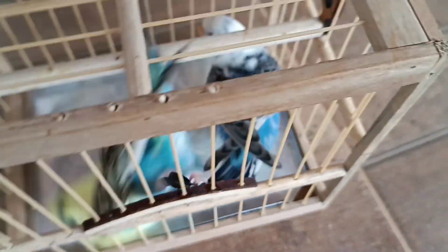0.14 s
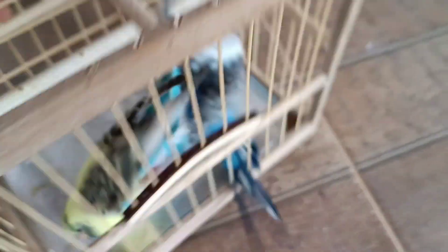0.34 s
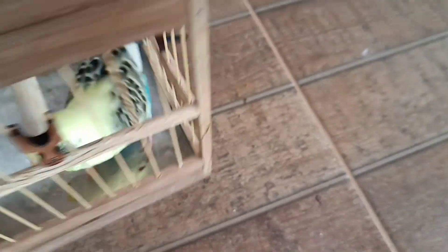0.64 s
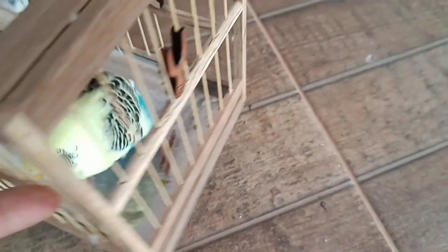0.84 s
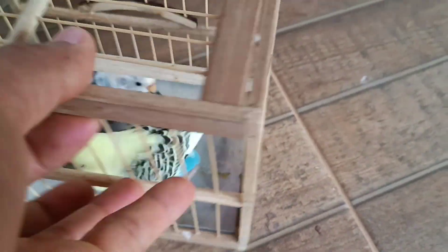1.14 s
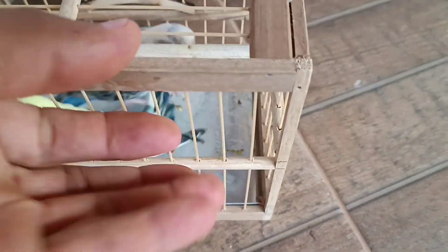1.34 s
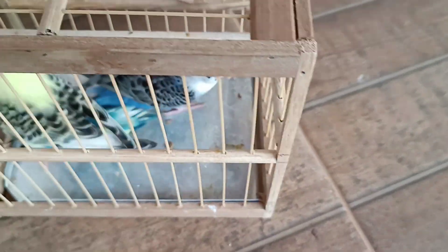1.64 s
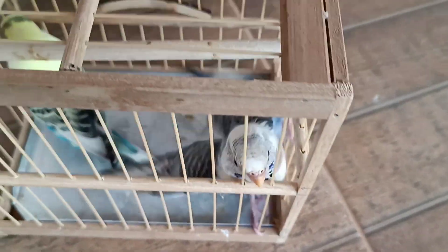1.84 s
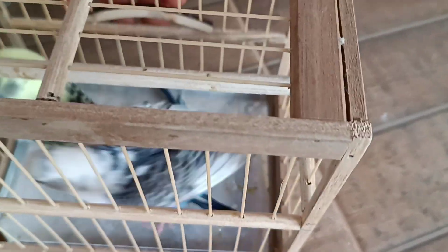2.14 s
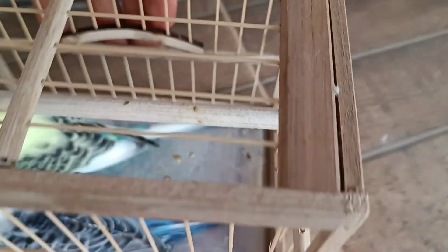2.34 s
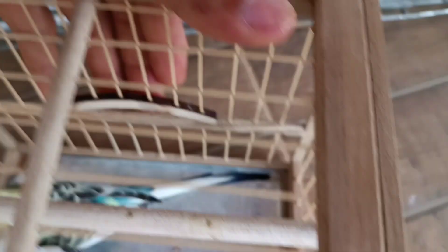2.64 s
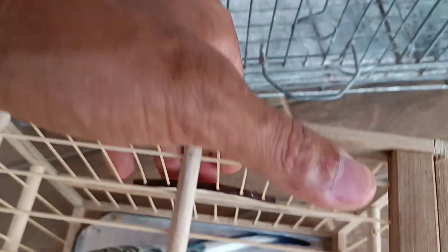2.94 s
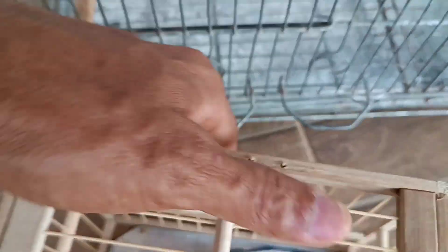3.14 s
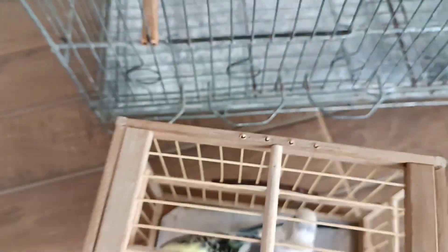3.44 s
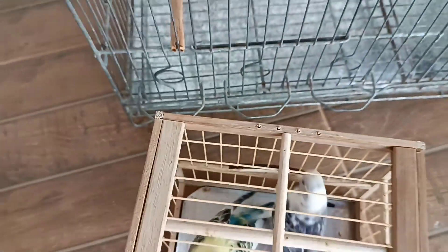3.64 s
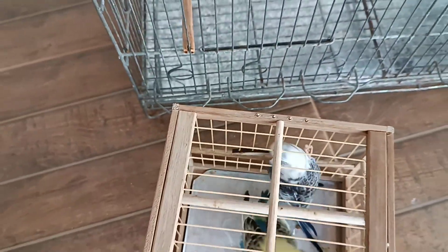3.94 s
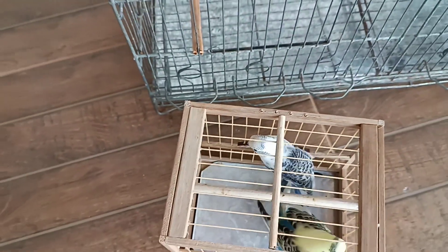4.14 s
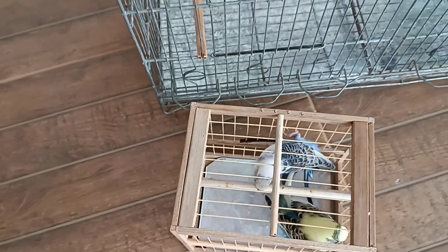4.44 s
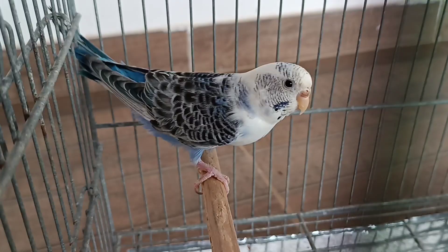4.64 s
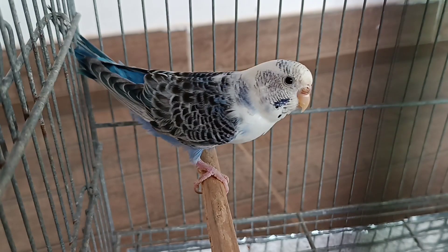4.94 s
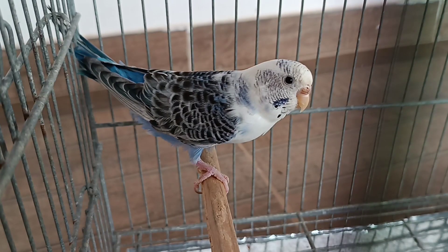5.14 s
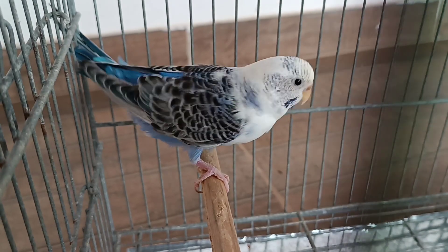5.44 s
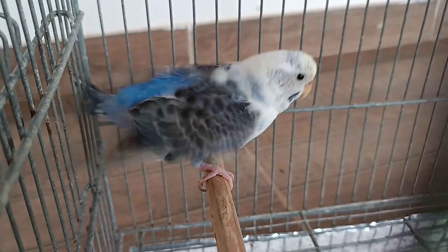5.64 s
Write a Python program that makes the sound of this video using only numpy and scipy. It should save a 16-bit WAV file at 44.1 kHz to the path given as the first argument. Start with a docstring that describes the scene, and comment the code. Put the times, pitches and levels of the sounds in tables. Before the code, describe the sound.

From the start, budgies scrabble in a small wooden cage close by: gritty claw ticks, feather rustles and light knocks on the frame and bars, with a sharper knock at 0.3 seconds. Wings flutter at about 1.2 and 1.9 seconds with soft thumps. Other birds warble and chirp faintly across the slightly echoing room, clearest around 1, 2.2 and 4 seconds, over quiet room tone. Low handling rumble builds near 3 seconds, and at 3.2 the cage is set down on tiles with a clattering wooden thud, the loudest event. A wing swishes at 3.5 seconds and the scratching thins out. At 4.6 seconds the sound cuts to silence, then quickly fades back in. One close bird gives two trilled, slightly raspy chirps at about 4.9 and 5.3 seconds, followed by a faint feather rustle until nearly 6 seconds.

```python
"""Budgerigars scrabble and flutter in a small wooden carry cage that a hand turns and sets down on tiles.
Claws tick on the tray in gritty bursts, feathers rustle, bodies ring the frame, bars and bottom.
Underneath are handling rumble, room tone and a flock warbling further off in the echoing room.
The sound then cuts to silence and fades back in on one close bird that chirps twice in a trilled whistle."""
import sys
import numpy as np
from scipy import signal
from scipy.fft import rfft, irfft
from scipy.io import wavfile
from scipy.ndimage import uniform_filter1d

SR = 44100
rng = np.random.default_rng(int(sys.argv[2]) if len(sys.argv) > 2 else 0)


def bounce(signal):
    """Save signal as a 16-bit WAV file at the path given by the first command-line argument."""
    frames = np.transpose(np.atleast_2d(signal))
    limited = np.clip(frames, -1, 1)
    pcm = np.round(limited * 32767).astype(np.int16)
    wavfile.write(sys.argv[1], SR, pcm)


N = 255780
T = np.arange(N) / SR

# room tone EQ: freq_hz, gain_db
ROOM_EQ = [(15, -31), (25, -9), (217, -1.5), (714, -17.5), (1190, -12.5), (1840, -15), (2160, -10.5),
           (3250, -7.5), (4370, -12.5), (4740, -18.5), (10700, -21), (14800, -24.5), (16000, -43)]
# reverb decay of the room: freq_hz, t60_s
ROOM_DECAY = [(150, 0.76), (1500, 0.43), (5000, 0.38), (14000, 0.17)]
# handling rumble EQ: freq_hz, gain_db
RUMBLE_EQ = [(24, -43), (40, -19.5), (92, -3), (275, 4), (391, 1), (609, -6.5), (790, -5.5), (900, -9),
             (1170, -32.5), (1980, -120)]
# phrases of the distant flock: start_s, hold_s, level_db, start_hz, end_hz
FLOCK_PHRASES = [(0.14, 0.034, -47, 2880, 3100), (0.83, .04, -57, 2800, 2900),
                 (0.962, 0.09, -47, 2938, 2900), (1.5, 0.081, -55, 3440, 3550),
                 (1.97, .12, -51, 3350, 3293), (2.25, .12, -52, 3300, 3305), (2.774, 0.16, -51, 3380, 3340),
                 (3.7, .22, -56.5, 3500, 3340), (4.399, .07, -54, 3190, 3044),
                 (4.52, .06, -56.5, 3400, 3597), (5.48, 0.035, -58, 2440, 2446),
                 (5.65, .04, -55, 3410, 3284)]
# single calls across the room: start_s, length_s, start_hz, end_hz, level_db
FAR_CALLS = [(.12, .02, 1075, 1514, -54), (0.148, 0.038, 1270, 1820, -52),
             (0.141, 0.047, 2910, 3390, -53.5), (.19, 0.052, 2050, 2400, -47.5),
             (0.817, 0.016, 3240, 3310, -47), (0.858, 0.01, 3470, 3550, -48.5),
             (.82, 0.033, 2380, 2370, -49), (.878, 0.058, 2350, 2580, -42),
             (0.914, 0.043, 3754, 3695, -39.5), (0.945, 0.046, 3600, 3370, -42),
             (0.958, 0.039, 2810, 2963, -36), (0.994, 0.046, 2500, 2310, -51),
             (1.001, 0.056, 3400, 2990, -51), (2.12, 0.043, 3330, 3300, -44),
             (2.155, 0.03, 3260, 3290, -48), (2.172, 0.037, 2000, 2510, -42),
             (2.203, 0.027, 3450, 3460, -41), (2.228, 0.021, 3360, 2860, -39),
             (2.252, .045, 2280, 1664, -49), (3.91, 0.03, 2150, 2500, -46),
             (3.941, 0.0286, 3604, 3120, -38), (3.973, 0.022, 3370, 3160, -54),
             (4.322, 0.033, 3780, 3620, -60), (4.344, 0.028, 1740, 1980, -54),
             (4.36, 0.045, 2500, 2490, -54.5), (4.392, 0.037, 3700, 3180, -45),
             (4.418, 0.048, 2760, 2822, -48.5), (4.44, 0.035, 3400, 3540, -55),
             (4.521, 0.043, 4000, 4290, -60), (4.526, 0.061, 2985, 3514, -59)]
# thin steady whistles and two faint low hoots, far off: start_s, length_s, start_hz, end_hz, level_db
FAR_WHISTLES = [(1.3, 0.081, 640, 660, -55.5), (1.46, 0.029, 4450, 4420, -56.5),
                (1.53, 0.025, 4470, 4470, -59), (1.58, 0.035, 4460, 4370, -59),
                (1.7, 0.13, 4360, 4323, -61.5), (2.27, 0.048, 647.5, 640, -65)]
# throat EQ that colours the overtones: freq_hz, gain_db
THROAT_EQ = [(700, -14), (1350, -6.5), (1800, -5.5), (2700, 9.5), (3600, -1.5), (5000, -8), (7500, 2.5),
             (15000, -6.5)]
# overtones of a bird's whistle: multiple, gain_db
VOICE_OVERTONES = [(2, -17.5), (3, -27), (4, -34.5), (5, -35.5), (6, -44)]
# the close bird, one curve for each note: time_s, pitch_hz, level_db
NEAR_NOTES = [
    [(4.867, 3630, -48), (4.876, 3667, -48.5), (4.89, 3430, -39)],
    [(4.891, 1816, -33), (4.902, 1832, -32), (4.91, 1890, -33), (4.927, 2185, -43)],
    [(4.929, 2187, -28), (4.94, 2224, -30), (4.95, 2387, -29), (4.96, 2480, -29), (4.985, 2530, -41),
     (5.003, 2455, -39), (5.02, 2083, -36), (5.04, 1767, -37.5), (5.05, 1436, -38), (5.062, 1340, -40)],
    [(5.241, 3210, -40), (5.248, 3222, -26.5), (5.256, 3180, -29.5), (5.259, 2900, -39), (5.265, 2660, -50)],
    [(5.268, 1785, -56), (5.285, 1740, -45.5), (5.296, 1837, -40.5)],
    [(5.306, 2430, -37), (5.322, 2436, -40), (5.335, 2400, -30.5), (5.352, 2460, -38)],
    [(5.383, 2430, -29), (5.39, 1955, -41.5), (5.407, 1966, -37), (5.418, 1364, -41.5), (5.432, 757, -58)],
]
# tremolo on each of those notes: depth
TRILL_DEPTHS = [.05, .05, .32, .02, .31, .36, .28]
# resonances of the cage bottom: pitch_hz, gain_db, t60_s
BOTTOM_MODES = [(96.2, -4, 0.52), (152.6, -2, 0.21), (188, -3, 0.12), (283.3, -3, 0.15), (378, -1.5, 0.063),
                (503, 1, 0.029), (571, 0, 0.069)]
# blows on the cage bottom: start_s, level_db, favoured_hz
BOTTOM_BLOWS = [(0.324, -40.5, 290), (1.207, -44, 292), (2.578, -50, 101.8), (2.646, -52.5, 97.4),
                (2.95, -29, 198.6), (2.982, -31.5, 227), (3.032, -35.5, 202.5), (3.163, -20, 550),
                (3.184, -26.5, 425), (3.215, -32.5, 100), (3.241, -31, 526)]
# puffs of air from a wing: start_s, level_db, final_hz, start_pitch_ratio
WING_PUFFS = [(1.066, -43, 100, 3.5), (1.503, -43, 75.6, 12.0), (1.862, -31, 103, 2.2)]
# resonances of the heavy frame: pitch_hz, width_hz, gain_db
FRAME_MODES = [(414, 41, -3), (734, 76, -9), (845, 85, -6), (1185, 276, 17), (1400, 35, 8), (1490, 270, 1)]
# resonances of the thin bars: pitch_hz, width_hz, gain_db
BAR_MODES = [(1945, 200, -1.5), (2254, 370, 3), (2720, 130, -1), (3370, 500, -24.5)]
# bodies knocking the frame: start_s, level_db, bars_offset_db
BODY_KNOCKS = [(0.32, -18.5, 5.5), (0.329, -16.5, 0), (0.44, -36.5, 16), (0.499, -21, 8.5),
               (0.529, -27.5, -10.5), (0.669, -37, 1), (0.779, -42, 9), (0.816, -42.5, 13),
               (0.903, -39, 11.5), (1.098, -35, -12), (1.145, -27.5, 10), (1.204, -34, 8.5),
               (1.217, -30, -10), (1.255, -35, 12), (1.305, -25.5, 5), (1.393, -35.5, -11),
               (1.503, -43, -18), (1.552, -32, -11), (1.788, -35, -1.5), (1.833, -35, 3.5),
               (1.852, -28.5, -7.5), (1.868, -25.5, -1), (1.887, -25.5, -7.5), (2.118, -42, 6),
               (2.136, -37, -8), (2.191, -35, 10), (2.388, -29, -8), (2.403, -32, -2), (2.671, -30.5, -7),
               (2.877, -41.5, -11.5), (2.954, -32, -6), (3.117, -38.5, -11), (3.128, -39, 3),
               (3.163, -10, -17), (3.168, -10.5, -9.5), (3.184, -13.5, -9.5), (3.196, -15, -11),
               (3.217, -18.5, -12), (3.242, -23, -25), (3.348, -18, -10.5), (3.434, -35, -10),
               (3.648, -27.5, -7), (3.708, -41, -27), (3.742, -39, -17), (3.828, -40, -15),
               (4.221, -43, -6), (5.382, -41.5, 12)]
# bouts of stirring in the cage: start_s, hold_s, feather_db, rattle_db, rumble_db
STIR_BOUTS = [(0.0, 0.015, -54.5, -57.5, -62.5), (0.235, 0.1, -48.5, -55, -66),
              (0.375, 0.14, -54, -52.5, -70), (1.09, 0.031, -72, -56, -57), (1.21, 0.17, -43, -49, -54.5),
              (1.849, 0.071, -47.5, -53, -51.5), (2.113, 0.28, -54, -63, -69),
              (2.44, 0.029, -77, -84, -61.5), (2.866, 0.068, -60, -61.5, -60.5),
              (2.959, 0.049, -85, -57, -42.5), (3.164, 0.072, -46.5, -31, -35.5),
              (3.52, 0.046, -43, -60, -59), (3.705, 0.38, -60, -64, -62), (4.226, 0.12, -62.5, -69, -61),
              (5.36, 0.13, -59.5, -82, -64.5), (5.619, 0.21, -62.5, -70, -63)]
# feather rustle EQ: freq_hz, gain_db
FEATHER_EQ = [(1000, -19), (2000, 11), (3500, 8.5), (6000, -2.5), (10000, -11), (13000, -14.5),
              (16000, -24)]
# wings sweeping the bars: start_s, length_s, level_db, centre_hz
WING_SWEEPS = [(1.2, 0.18, -41.5, 5100), (1.3, 0.14, -75, 4000), (1.84, 0.22, -57, 7000),
               (3.2, 0.089, -58, 5000), (3.505, 0.14, -37, 4400)]
# claws on the tray: start_s, level_db, dull_offset_db, length_s
CLAW_TICKS = [(0.208, -35.5, -1, 0.01), (0.237, -29.5, -18, 0.015), (0.28, -43.5, -11.5, 0.034),
              (0.3116, -31, -22, 0.01), (0.319, -16.5, 6, 0.0052), (0.328, -25, 2.5, 0.0068),
              (0.351, -30, 4, 0.015), (0.411, -39, -14.5, 0.015), (0.421, -32, -20, 0.015),
              (0.443, -34.5, 0.5, 0.014), (0.4755, -36, -16, 0.027), (0.492, -23, -6, 0.012),
              (0.529, -37, -4, 0.012), (0.598, -43, -22, 0.032), (0.6574, -24, -34, 0.013),
              (0.741, -28, -30, 0.0064), (0.78, -29.5, -28, 0.0085), (0.815, -32, -16, 0.016),
              (0.839, -30, -35, 0.0088), (0.864, -33.5, -18, 0.012), (0.8985, -31, -29, 0.021),
              (0.9472, -25, -36, 0.017), (1.072, -32.5, -27, 0.011), (1.142, -43, 9, 0.03),
              (1.181, -33, -8, 0.009), (1.1987, -24.5, 9, 0.0063), (1.252, -26, 6, 0.013),
              (1.358, -34, -14, 0.027), (1.433, -29, 0, 0.0055), (1.472, -49, 9, 0.011),
              (1.495, -33.5, -18, 0.013), (1.531, -35.5, 7, 0.0087), (1.592, -39, -15, 0.0054),
              (1.607, -34.5, -19, 0.0052), (1.764, -37.5, -25, 0.011), (1.786, -51.5, 12.5, 0.018),
              (1.821, -26, -5.5, 0.014), (1.853, -29.5, 6.5, 0.01), (1.871, -30, 3, 0.0091),
              (1.8893, -21, -2, 0.0075), (1.911, -26, -9, 0.011), (1.976, -27.5, -18, 0.0057),
              (1.9994, -36, -3, 0.0082), (2.059, -28.5, 2, 0.0094), (2.1081, -27.5, 15, 0.0043),
              (2.131, -32, 2, 0.01), (2.1888, -36, 18, 0.0058), (2.3334, -36.5, 3, 0.016),
              (2.353, -27, 1, 0.013), (2.388, -26.5, -2, 0.0091), (2.401, -31, 9.5, 0.0075),
              (2.4708, -33, 3, 0.0071), (2.663, -37, 3, 0.012), (2.675, -33.5, 14.5, 0.0032),
              (2.74, -44.5, -11, 0.011), (2.954, -48, 3, 0.028), (3.133, -47.5, 12.5, 0.0094),
              (3.167, -35, -12.5, 0.0099), (3.183, -23.5, -21, 0.014), (3.3477, -23.5, 1, 0.0067),
              (3.434, -29.5, 2.5, 0.011), (3.598, -30, -25, 0.01), (3.6415, -30.5, -0.5, 0.013),
              (3.7764, -30, -5, 0.01), (3.826, -26, -21, 0.0062), (3.96, -40, 4.5, 0.011),
              (4.079, -37.5, 1.5, 0.014), (4.239, -38.5, -19, 0.016), (4.356, -36.5, -18, 0.0065)]
# EQ of a claw's bright scratch: freq_hz, gain_db
CLAW_EQ = [(1500, -11), (2500, 0), (5000, -8), (8500, 1), (10500, 3.5), (13000, -9), (16000, -16)]

TOP_HZ = 16300  # ceiling for overtones and for the mix
CREST_DB = 10  # headroom for the peaks of gritty noise
BOUT_ATTACK_S, BOUT_RELEASE_S = 0.029, 0.55


def undb(db):
    """Decibels to gain."""
    return 10 ** (np.asarray(db, float) / 20)


def unit(x):
    """Normalise to an RMS of 1."""
    return x / np.sqrt(np.mean(x ** 2))


def eq_db(hz, table):
    """Read an EQ curve on a log frequency axis."""
    points_hz, db = np.transpose(table)
    return np.interp(np.log(hz), np.log(points_hz), db)


def colour(x, table):
    """Apply an EQ curve; white noise keeps its power."""
    gain = undb(eq_db(np.arange(N // 2 + 1) * SR / N + 1, table))
    return irfft(rfft(x) * unit(gain), N)


def ring(x, hz, width_hz):
    """One resonance, gain 1 at its centre."""
    return signal.lfilter(*signal.iirpeak(hz, hz / width_hz, SR), x)


def walk(rate_hz):
    """Slewed random sample-and-hold with a spread near 1."""
    step = int(SR / rate_hz)
    return 1.2 * uniform_filter1d(np.repeat(rng.standard_normal(N // step + 1), step), step)[:N]


def grit(rate_hz, depth_db):
    """Noise whose level jumps from grain to grain."""
    return unit(rng.standard_normal(N) * undb(depth_db * walk(rate_hz)))


def held(start, hold, attack_s, release_s):
    """Envelope at full level from start through hold; attack and release each span 60 dB."""
    early, late = np.clip(start - T, 0, None), np.clip(T - start - hold, 0, None)
    return undb(-60 * (early / attack_s + late / release_s))


def bursts(starts, dbs, lengths, rise_s=0.0013):
    """Envelope of brief contacts: sharp attack, quick decay."""
    env, t = np.zeros(N), T[:3000]
    for start, db, length in zip(starts, dbs, lengths):
        shape = (1 - np.exp(-t / rise_s)) * np.exp(-(t / length) ** 1.32)
        env[int(start * SR):][:len(t)] += undb(db) * shape
    return env


def room_tone(level_db=-60, lift_s=5, lift_db=1):
    """A gently wavering bed with the sub-bass cut, a touch louder by the close bird."""
    tone = colour(grit(9, 2), ROOM_EQ) * undb(level_db + lift_db * (T > lift_s))
    return signal.sosfilt(signal.butter(2, 50, "high", fs=SR, output="sos"), tone)


def reverb(x, predelay_s=.006):
    """Diffuse tail of the room, the treble dying first."""
    t, tail = T[:SR], 0
    hz, t60s = np.transpose(ROOM_DECAY)
    for centre in 100 * 2 ** np.arange(0, 7.5, .5):
        band = unit(ring(rng.standard_normal(SR), centre, centre / 2)) * np.sqrt(centre)
        t60 = np.interp(np.log(centre), np.log(hz), t60s)
        tail += band * undb(-60 * t / t60)
    tail *= np.clip((t - predelay_s) / 0.0018, 0, 1)
    return signal.fftconvolve(x, tail / np.sqrt(np.sum(tail ** 2)))[:N]


def handling(rumble, buffet_hz=49.9, buffet_db=-65.5):
    """The hand rumbles on the cage, and air buffets the microphone while it is carried."""
    hand = rumble * colour(grit(30, 2), RUMBLE_EQ)
    gusts = unit(ring(ring(grit(5.5, 4), buffet_hz, 50), buffet_hz, 50))
    carried = held(start=2.55, hold=1.05, attack_s=BOUT_ATTACK_S, release_s=2.5)
    return hand + undb(buffet_db) * carried * gusts


def flock(rasp_db=5):
    """Six distant birds warble short, raspy glides around a common pitch."""
    start, hold, _, start_hz, end_hz = np.transpose(FLOCK_PHRASES)
    centre = np.interp(T, np.ravel([start, start + hold], "F"), np.ravel([start_hz, end_hz], "F"))
    voices = 0
    for detune in (-0.14, -0.011, 0.065, 0.057, .05, 0.039):
        pitch = centre * np.exp(detune + .04 * walk(60) + .03 * walk(400))
        flicker = undb(3 * walk(60) + rasp_db * walk(250))
        voices += np.sin(2 * np.pi * np.cumsum(pitch) / SR) * flicker
    phrasing = sum(undb(db) * held(at, length, attack_s=.16, release_s=.29)
                   for at, length, db, *_ in FLOCK_PHRASES)
    return unit(voices) * phrasing


def whistle(t, hz, db, trill, trill_hz=140):
    """A near-sine voice with fast tremolo; overtones grow when pushed and where the throat favours them."""
    phase = 2 * np.pi * np.cumsum(hz) / SR
    tone = np.sin(phase)
    push_db = .6 * (db + 28)
    for k, share_db in VOICE_OVERTONES:
        throat_db = eq_db(k * hz, THROAT_EQ) - eq_db(hz, THROAT_EQ)
        tone += undb(share_db + throat_db + push_db) * np.sin(k * phase) * (k * hz < TOP_HZ)
    gate = np.clip(np.minimum(t - t[0], t[-1] - t) / 0.0011, 0, 1)
    tremolo = 1 + trill * np.sin(2 * np.pi * trill_hz * t)
    return np.sqrt(2) * tone * gate * undb(db) * tremolo


def sing(notes, trills, wobble):
    """Whistle each note curve; wobble is fast jitter as a fraction of the pitch."""
    out, jitter = np.zeros(N), 1 + wobble * walk(300)
    for note, trill in zip(notes, trills):
        times, hz, db = np.transpose(note)
        part = slice(int(times[0] * SR), int(times[-1] * SR))
        t = T[part]
        out[part] += whistle(t, np.interp(t, times, hz) * jitter[part], np.interp(t, times, db), trill)
    return out


def far_calls(rows, wobble):
    """Birds across the room whistle plain glides that swell and fade."""
    notes = [[(at, f0, db - 12.5), (at + length / 2, (f0 + f1) / 2, db), (at + length, f1, db - 10)]
             for at, length, f0, f1, db in rows]
    return sing(notes, np.zeros(len(notes)), wobble)


def near_bird(rasp_db=1.5):
    """One close bird chirps in trilled notes with a slight rasp."""
    return sing(NEAR_NOTES, TRILL_DEPTHS, wobble=.018) * undb(rasp_db * walk(400))


def thuds(octave_loss_db=25.5, puff_t60_s=.12, sag_s=.008):
    """Blows ring the cage bottom around a favoured pitch; wing puffs thump with a sagging pitch."""
    out, t = np.zeros(N), T[:SR // 2]
    attack = 1 - np.exp(-t / 0.0026)
    for start, db, favoured_hz in BOTTOM_BLOWS:
        for hz, mode_db, t60 in BOTTOM_MODES:
            share_db = mode_db - octave_loss_db * np.log2(hz / favoured_hz) ** 2
            env = attack * undb(db + share_db - 60 * t / t60)
            out[int(start * SR):][:len(t)] += env * np.sin(2 * np.pi * hz * t)
    for start, db, hz, ratio in WING_PUFFS:
        phase = 2 * np.pi * hz * (t + (ratio - 1) * sag_s * (1 - np.exp(-t / sag_s)))
        out[int(start * SR):][:len(t)] += attack * undb(db - 60 * t / puff_t60_s) * np.sin(phase)
    return out * undb(6.1 * walk(140))  # loose wood makes the ring uneven


def wood(push, modes):
    """Wood rings briefly when pushed; the soft contact gives it little treble."""
    power = sum(undb(2 * db) * width for _, width, db in modes) * np.pi / SR
    body = sum(undb(db) * ring(push, hz, width) for hz, width, db in modes) / np.sqrt(power)
    return signal.sosfilt(signal.butter(2, [450, 4200], "band", fs=SR, output="sos"), body)


def knocks(rattle, contact_s=0.0091):
    """Bodies knock the heavy frame and the thin bars; loose joints rattle on."""
    starts, db, bars_db = np.transpose(BODY_KNOCKS)
    lengths = np.full(len(starts), contact_s)
    crack = np.zeros(N)
    crack[(starts * SR).astype(int) + 20] = undb(db + 10)  # the first hard touch
    on_frame = crack + grit(500, 3) * bursts(starts, db - CREST_DB, lengths)
    frame = wood(on_frame + rattle * grit(300, 3), FRAME_MODES)
    on_bars = grit(500, 3) * bursts(starts, db + bars_db - CREST_DB, lengths)
    return frame + wood(on_bars + rattle * grit(300, 3) / 2, BAR_MODES)


def wings(rustle):
    """Wings swish along the bars, swelling fast and tapering off, over a grainy rustle of feathers."""
    swishes = 0
    for start, length, db, hz in WING_SWEEPS:
        stroke = np.clip((T - start) / length, 0, 1)
        swell = np.abs(np.sin(np.pi * stroke ** 0.56)) ** 1.2
        hiss = unit(ring(ring(grit(400, 1.7), hz, 0.69 * hz), hz, 1.2 * hz))
        swishes += undb(db) * swell * hiss
    return swishes + rustle * colour(grit(250, 2.4), FEATHER_EQ)


def claws():
    """Each scratch is a bright gritty burst with a duller layer from the tray."""
    starts, db, dull_db, lengths = np.transpose(CLAW_TICKS)
    bright = colour(grit(900, 3) * bursts(starts, db - CREST_DB, lengths), CLAW_EQ)
    on_tray = grit(700, 3) * bursts(starts, db + dull_db - CREST_DB, lengths)
    makeup_gain = np.sqrt(SR / np.pi / 3500)
    return bright + makeup_gain * ring(on_tray, hz=3600, width_hz=2400)


def scene():
    """Mix cage and birds over the room tone; the further a source, the wetter it sounds."""
    rustle, rattle, rumble = sum(undb(dbs)[:, None] * held(start, hold, BOUT_ATTACK_S, BOUT_RELEASE_S)
                                 for start, hold, *dbs in STIR_BOUTS)
    cage = knocks(rattle) + claws() + wings(rustle)
    calls = far_calls(FAR_CALLS, wobble=.012) * undb(3.5 * walk(250))  # rasp
    calls += far_calls(FAR_WHISTLES, wobble=0)
    chatter, chirps, thumps = flock(), near_bird(), thuds()
    direct = cage + thumps + chirps + undb(0.5) * calls + undb(-22.5) * chatter
    send = (undb(-11) * cage + undb(-10) * thumps + undb(-6) * chirps
            + undb(-3.5) * calls + undb(-2.5) * chatter)
    return (direct + reverb(send) + handling(rumble) + room_tone())[None]


def record(dry, cut_s=4.588, return_s=4.72, fade_s=0.21, rolloff_hz=15400):
    """A hard cut to silence, then a fade-in; two steep low-passes take off the very top."""
    cut = np.clip((cut_s - T) / 0.0023, 0, 1)
    fade_in = np.clip((T - return_s) / fade_s, 0, 1) ** 1.26
    mix = dry * (cut + fade_in + 1e-5)
    mix = signal.sosfilt(signal.ellip(5, .3, 24, rolloff_hz, fs=SR, output="sos"), mix)
    return signal.sosfilt(signal.ellip(10, .2, 70, TOP_HZ, fs=SR, output="sos"), mix)


dry = scene()
out = record(dry)
bounce(out)
```